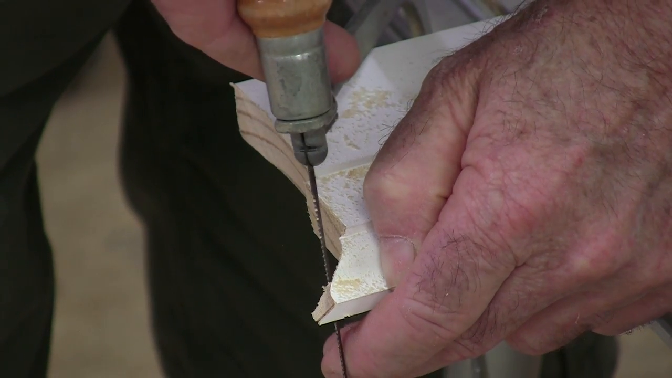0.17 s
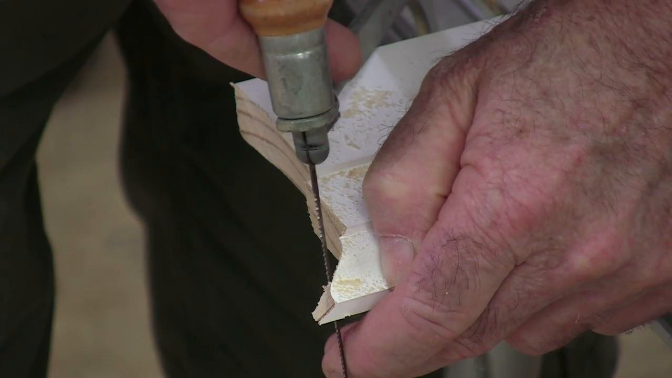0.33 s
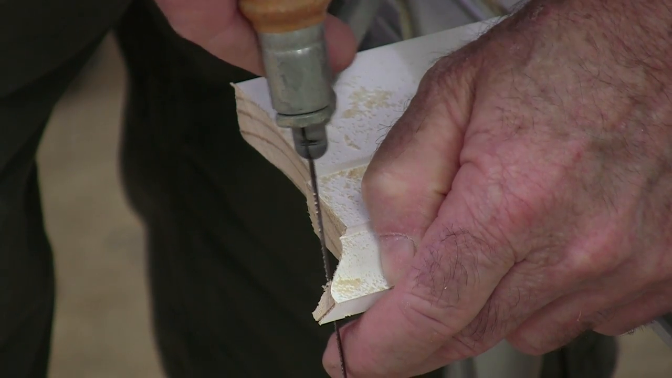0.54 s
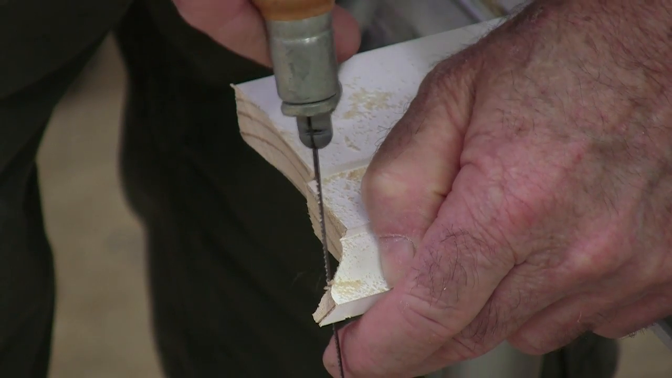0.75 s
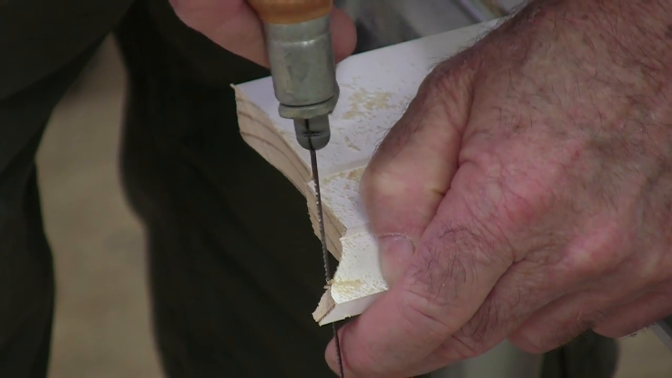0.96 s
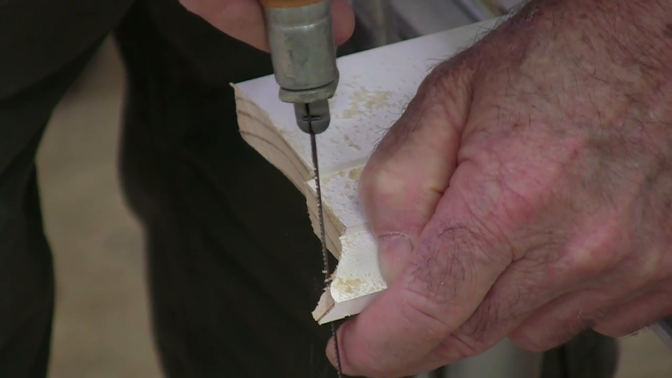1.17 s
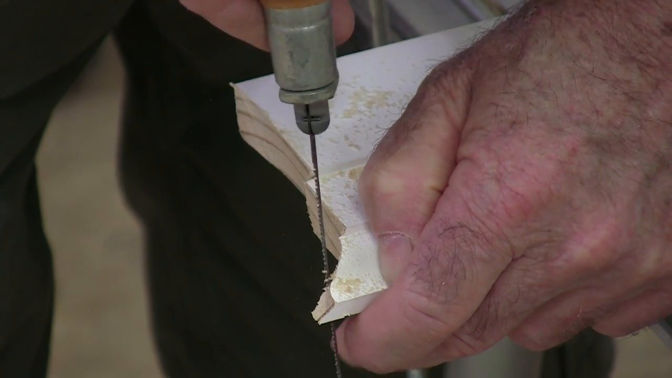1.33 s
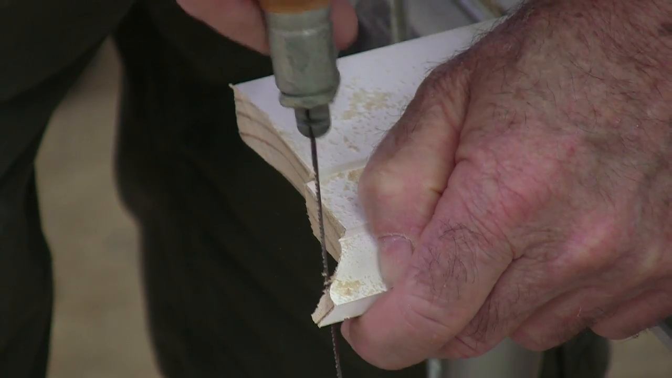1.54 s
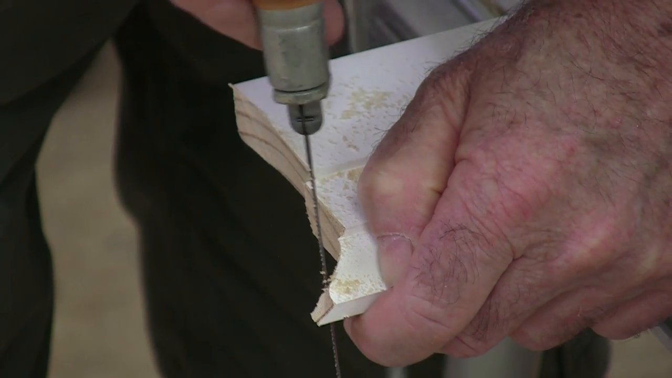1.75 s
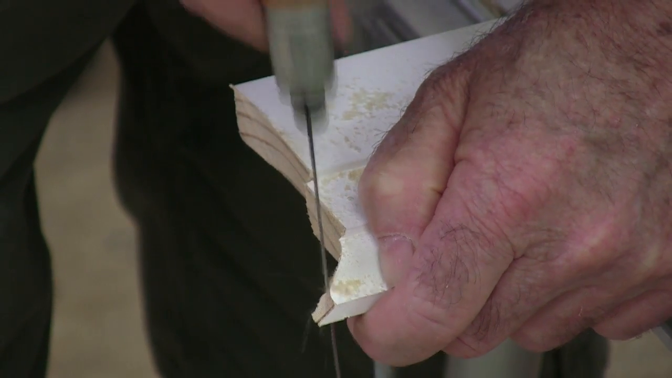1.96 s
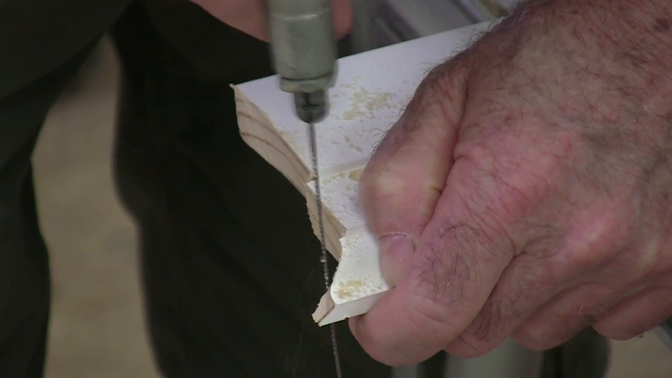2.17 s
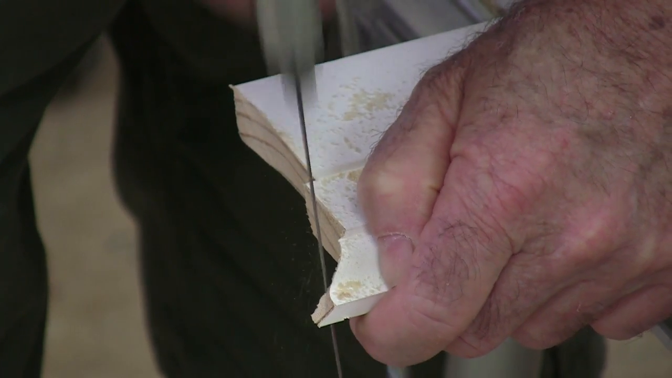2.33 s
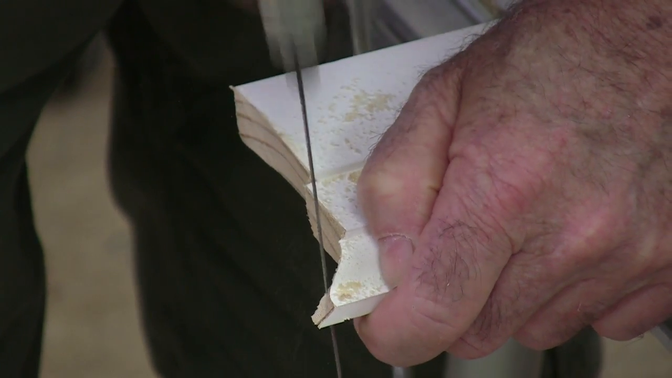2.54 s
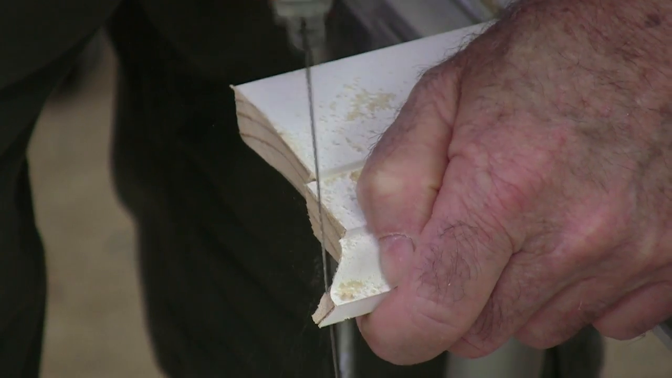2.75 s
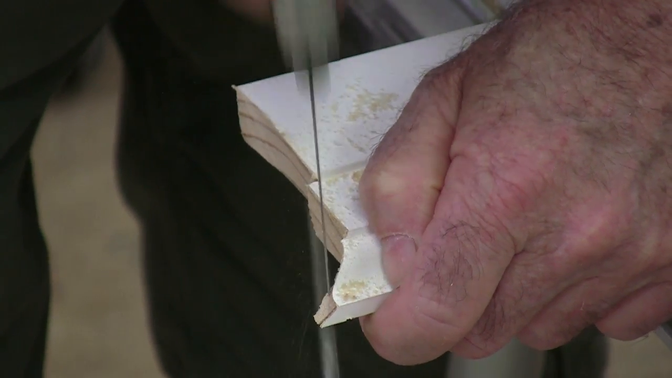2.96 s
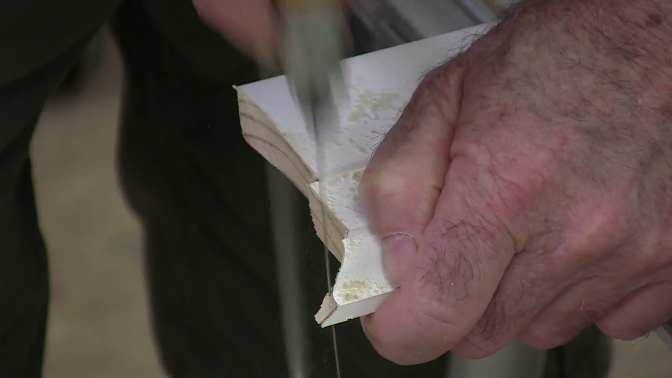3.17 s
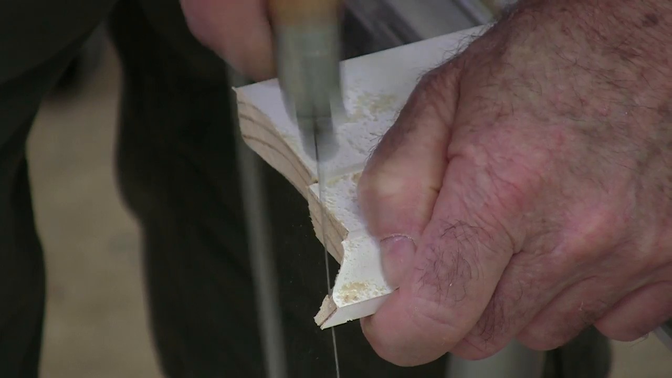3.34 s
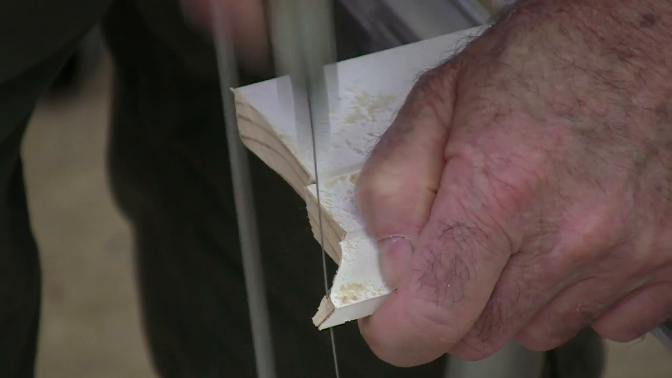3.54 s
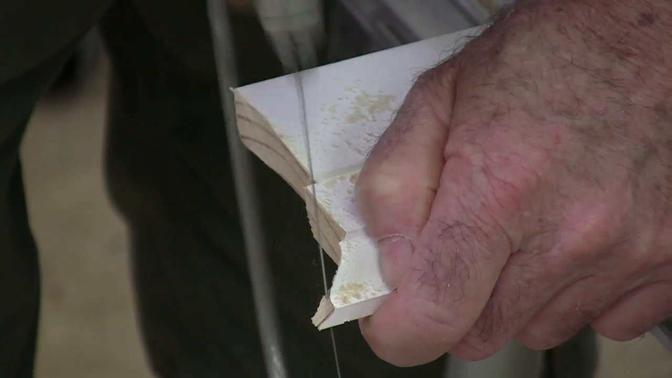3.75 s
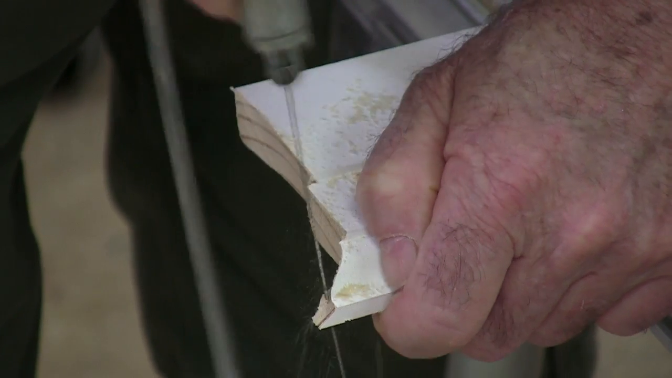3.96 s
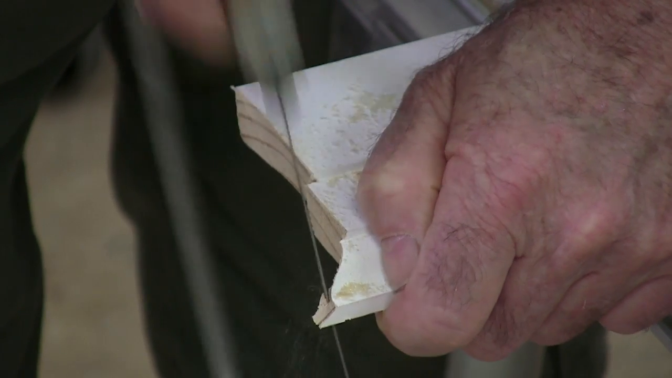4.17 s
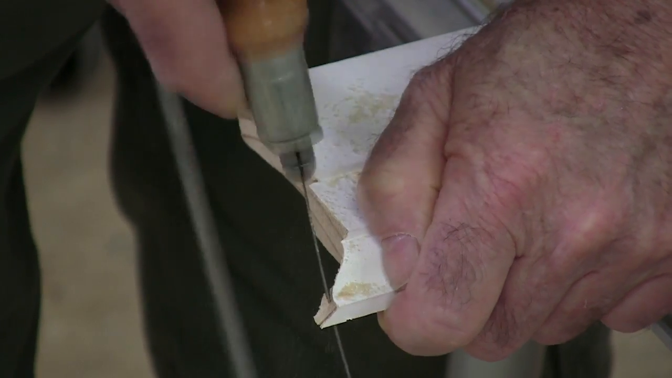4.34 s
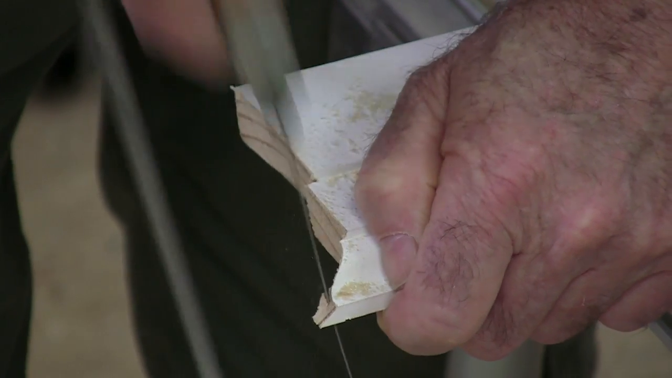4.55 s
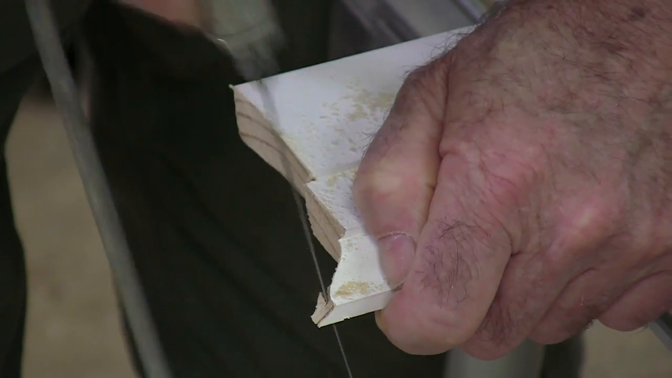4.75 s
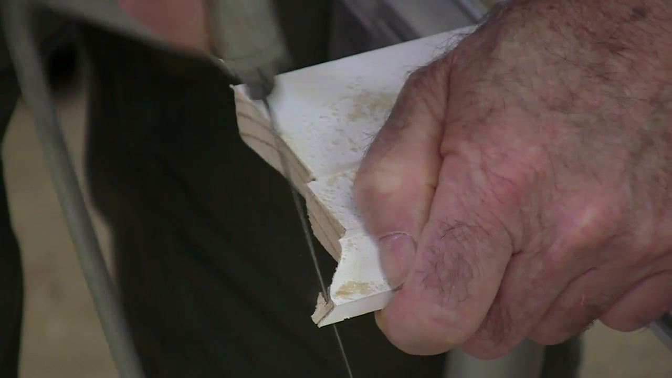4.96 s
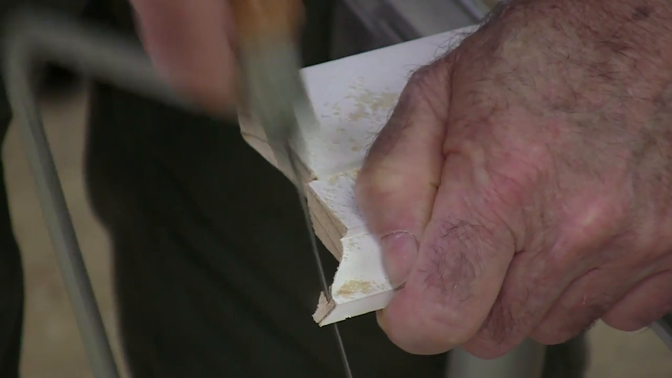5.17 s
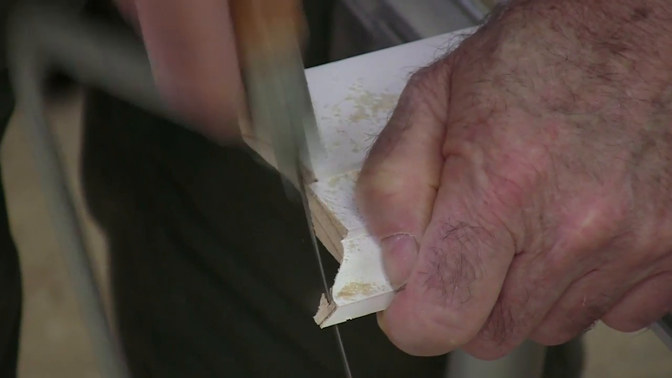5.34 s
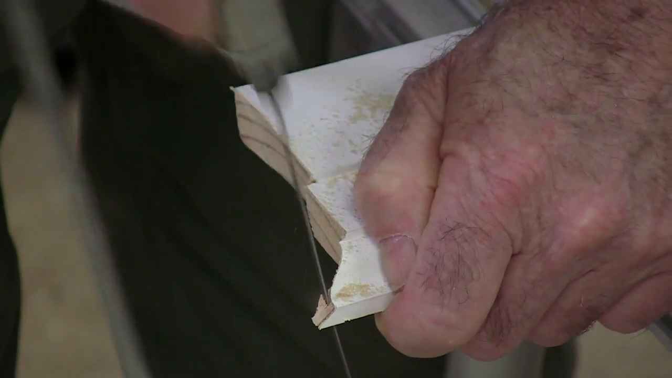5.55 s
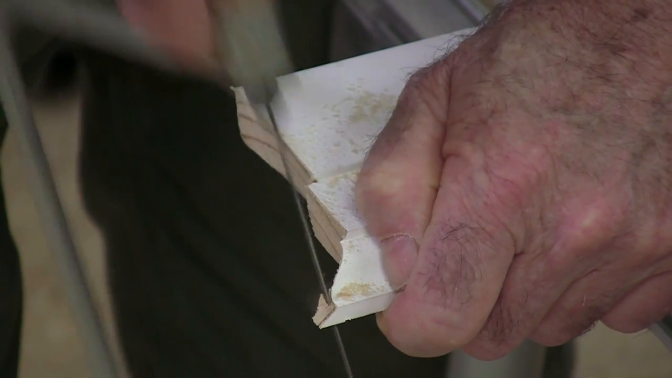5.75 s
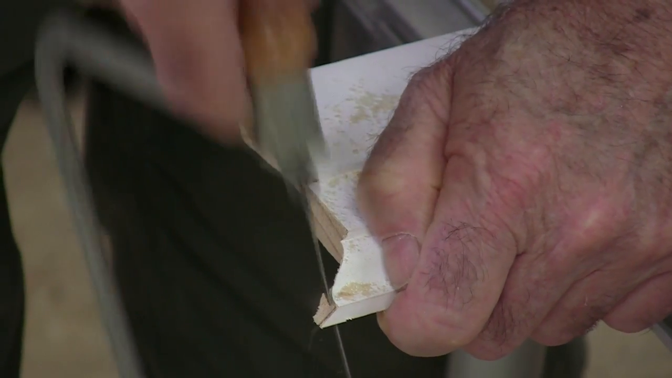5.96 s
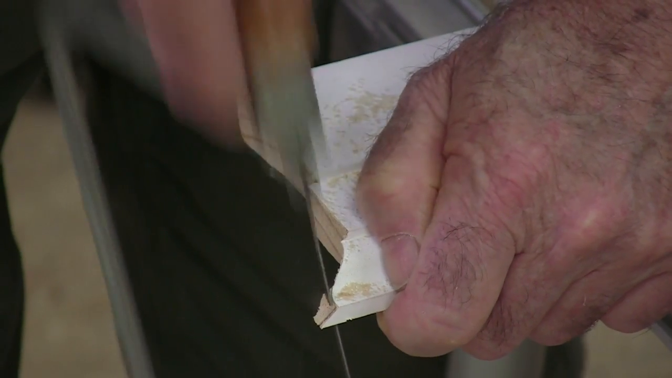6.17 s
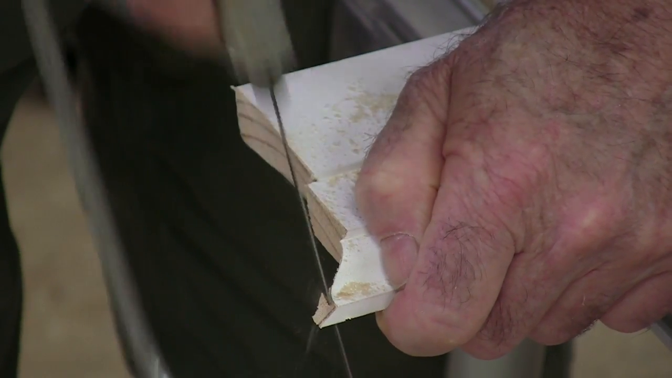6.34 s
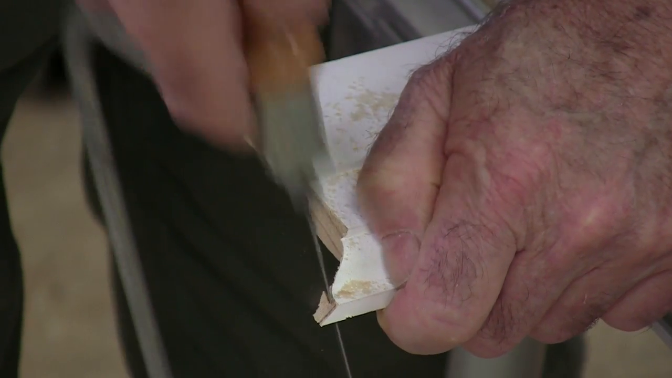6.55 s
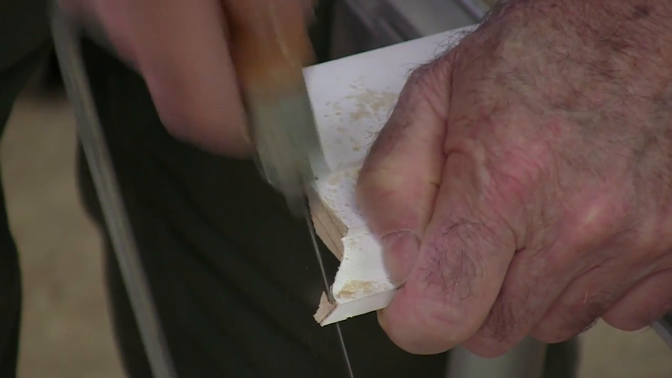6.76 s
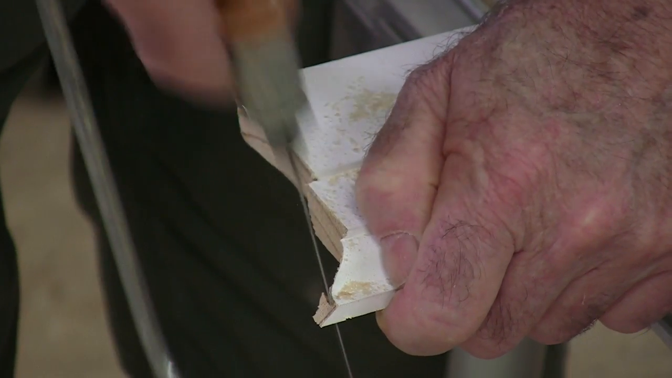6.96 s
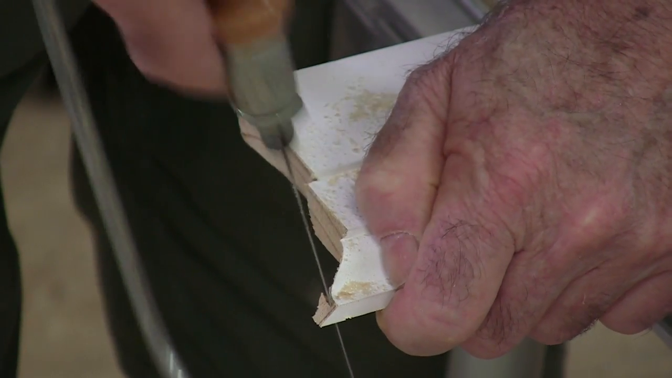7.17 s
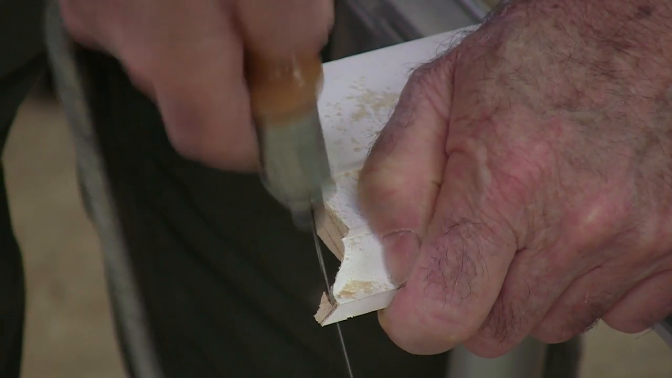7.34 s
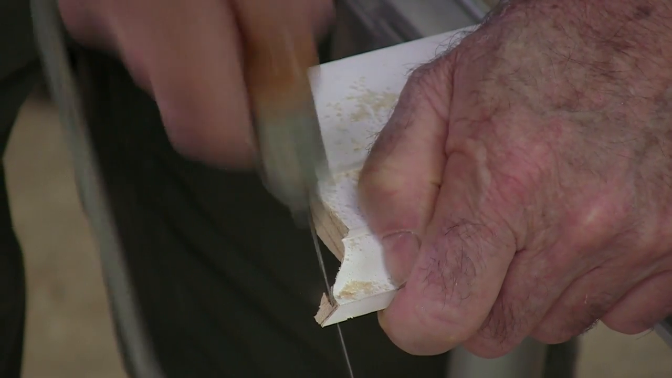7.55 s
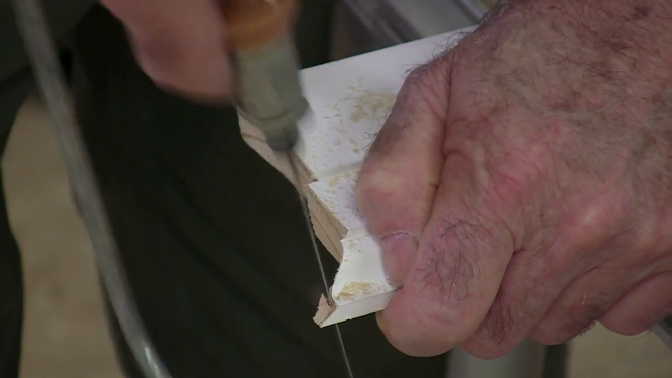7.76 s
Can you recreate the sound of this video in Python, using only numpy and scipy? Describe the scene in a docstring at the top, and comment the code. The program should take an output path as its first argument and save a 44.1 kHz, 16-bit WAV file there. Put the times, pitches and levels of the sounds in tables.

```python
"""A coping saw rasps through a hand-held piece of baseboard, there and back about four times a second,
after a few taps and light scrapes as it is set on the wood. Streams of tooth snaps and torn-fibre noise
ring the thin tip of the board and thud in its body; single blows excite the same resonances, and a
binding blade squeaks as a gliding sine. A small workshop answers with a tail of decaying noise; rumble
and hiss lie underneath, and a limiter ducks the loudest peaks."""
import sys
import numpy as np
from scipy import signal
from scipy.fft import rfft, irfft, next_fast_len
from scipy.io import wavfile
from scipy.ndimage import uniform_filter1d, minimum_filter1d, map_coordinates

SR = 44100
rng = np.random.default_rng(int(sys.argv[2]) if len(sys.argv) > 2 else 0)


def dump_mix(stems):
    """Bounce the given channels to the path in sys.argv[1] as a 16-bit WAV at rate SR."""
    frames = np.atleast_2d(stems).T  # one column per channel
    limited = np.clip(frames, -1, 1)  # hard clip at full scale
    pcm = np.round(limited * 32767).astype(np.int16)
    wavfile.write(sys.argv[1], SR, pcm)


N = 344112  # samples

# The saw strokes, there and back; levels are ahead of the mix trims. Each row: teeth catch in seconds,
# snag level in dB, cut level in dB, lean from start to end of the cut in dB, easing in mid-cut in dB,
# board flex relative to the cut in dB, return starts in seconds, return level in dB.
STROKES = [(2.024, -23, -27.5, 5, -1, 4, 2.121, -42), (2.284, -27, -27.5, -6, -1.5, -7, 2.375, -26.5),
           (2.496, -16.5, -24, -2, 1.5, -3, 2.604, -24.5), (2.738, -25, -18.5, 12.5, -2, 0, 2.846, -22.5),
           (2.98, -27, -22.5, 6, -3.5, -6, 3.096, -23), (3.224, -29, -22, 8.5, 1, -16, 3.34, -23),
           (3.462, -15.5, -23.5, 2, 0, -8, 3.58, -22.5), (3.702, -20, -20, 1.5, -1, -4, 3.822, -22),
           (3.956, -3.5, -16.5, -4, 3, -0.5, 4.076, -24), (4.209, -4.5, -19, -6, 2.5, -9.5, 4.323, -25.5),
           (4.459, -24, -24, 0, -0.5, -14.5, 4.568, -26), (4.706, -23, -26.5, -7, 1, -13, 4.829, -29),
           (4.958, -21, -27, -0.5, 3, -10, 5.076, -29.5), (5.222, -23, -28.5, 0, 3, -12.5, 5.346, -27),
           (5.484, -15.5, -20.5, 9, 2.5, -14.5, 5.617, -23), (5.759, -11, -21, 6.5, 0, -11.5, 5.89, -22.5),
           (6.031, -8.5, -17.5, 1.5, 0.5, -17, 6.175, -22), (6.33, -8.5, -17, -2, 1.5, -8.5, 6.464, -22),
           (6.614, -18, -21.5, 4, 4.5, -13, 6.76, -26.5), (6.901, -29, -25, -2, 5, -11, 7.027, -23.5),
           (7.163, -21, -24, 0, 9, -10, 7.286, -26), (7.432, -16, -24.5, -8, 4, -15.5, 7.564, -22.5),
           (7.697, -22.5, -23, 3, 3.5, -8.5, 7.81, -24)]
# Resonances of the board's body. Each row: centre in Hz, width in Hz, relative level in dB.
BODY_MODES = [(307.4, 37.7, 3), (379.8, 49, -0.5), (509, 103, -2.5), (624, 19, -17.5), (700, 50, -21)]
# Resonances of the hand's grip. Each row: centre in Hz, width in Hz, relative level in dB.
GRIP_MODES = [(58.4, 60, -.7), (127, 25.5, 6)]
# Resonances of the whole board flexing. Each row: centre in Hz, width in Hz, relative level in dB.
FLEX_MODES = [(162.5, 38, 3), (209.7, 41, .5), (240.5, 35, -4)]

SNAG_AFTER_S = 0.015  # from the reversal until the teeth catch
THUD_PER_FLEX = 0.32  # dB of body thud per dB of board flex


def amp(db):
    """Decibels to gain."""
    return 10 ** (np.asarray(db) / 20)


def unit(x):
    """Scale to rms 1."""
    return x / np.sqrt(np.mean(x ** 2) + 1e-20)


def add(out, s, sound):
    """Mix a sound into out from s seconds on."""
    part = out[round(s * SR):][:len(sound)]
    part += sound[:len(part)]


def along(points, hz):
    """Read (Hz, value) points on a log frequency axis."""
    point_hz, value = np.transpose(points)
    return np.interp(np.log(hz + 1), np.log(point_hz), value)


def filtered(x, response):
    """Multiply the spectrum of x by a response of frequency."""
    size = next_fast_len(N + SR // 2)
    gain = response(np.fft.rfftfreq(size, 1 / SR))
    return irfft(rfft(x, size) * gain, size)[:N]


def through(x, ring):
    """Play x through an impulse response."""
    return signal.fftconvolve(x, ring)[:N]


def wobble(rate):
    """A smooth random curve with rate knots a second."""
    knots = rng.standard_normal(int(N * rate / SR) + 4)
    return map_coordinates(knots, [np.arange(N) * rate / SR])


def ringing(modes, size=8192):
    """Minimum-phase impulse response, of energy 1, of a set of resonances."""
    hz = np.fft.rfftfreq(size, 1 / SR)
    power = sum((amp(db) / (1 + (2 * (hz - centre) / width) ** 2)) ** 2 for centre, width, db in modes)
    # folding the cepstrum forward in time makes the response causal
    cepstrum = irfft(np.log(power + 1e-12) / 2)
    cepstrum[1:size // 2] *= 2
    cepstrum[size // 2:] = 0
    ring = irfft(np.exp(rfft(cepstrum)))
    return ring / np.linalg.norm(ring)


def varied(modes, level_db=0.98, detune_db=0.26):
    """Each contact meets the wood at another spot: mode strengths and pitches shift a little."""
    hz, width, db = np.transpose(modes)
    chance = rng.standard_normal((len(hz), 2))
    shifted_hz = hz * amp(detune_db * chance[:, 0])  # detuning is a ratio given in dB
    return np.transpose([shifted_hz, width, db + level_db * chance[:, 1]])


def tip_ring(s, treble_from_hz=1750, width_hz=150, db=0):
    """The thin tip's ring after s seconds; one strong resonance sinks overall as the cut deepens."""
    # Resonances of the tip. Each row: centre in Hz, width in Hz, relative level in dB.
    tip_modes = [(803, 43, 0.5), (917, 123, -1.5), (1099, 176, 0), (1279, 217, 0), (1568, 14, -8.5),
                 (1665, 19, -5.5), (1872, 136, -8), (2135, 163, -14), (2433, 63, -19), (2813, 410, -22),
                 (3256, 336, -17), (3796, 260, -23.5), (4253, 550, -22.5), (4800, 130, -38)]
    # The tip's sinking resonance. Each row: time in seconds, centre in Hz.
    sinking = [(1.1, 1613), (2.2, 1456), (3.1, 1472), (4.8, 1378), (6.5, 1348)]
    # Shift of the upper tip resonances against the lower. Each row: time in seconds, shift in dB.
    treble = [(1.1, -1), (2.1, -3), (2.7, -2), (3.3, -.5), (4.2, -1), (5.1, 4), (5.7, -1), (6.7, 2),
              (7.5, -.5)]
    treble_db = np.interp(s, *np.transpose(treble))
    modes = [(hz, width, level + treble_db * (hz > treble_from_hz)) for hz, width, level in tip_modes]
    sinking_hz = np.interp(s, *np.transpose(sinking))
    return ringing(varied(modes + [(sinking_hz, width_hz, db)]))


def background(level_db=-42):
    """Steady rumble and hiss: white noise shaped by a spectrum curve."""
    # Tilt of the background noise. Each row: frequency in Hz, relative level in dB.
    air = [(20, 8.5), (35, 6.5), (90, 1), (160, -4.5), (500, -9.5), (750, -10), (1400, -13), (3000, -13.5),
           (6000, -15.5), (12000, -17), (15500, -19)]
    noise = filtered(rng.standard_normal(N), lambda hz: amp(along(air, hz)))
    return amp(level_db) * unit(noise)


def snags(thud_db=-6, shove_db=-8):
    """Each cut opens with a blow as the teeth catch; a flexing board thuds and shoves more."""
    blows = []
    for s, snag_db, _, _, _, flex_db, _, _ in STROKES:
        flexing_db = snag_db + THUD_PER_FLEX * flex_db
        blows.append((s, snag_db, flexing_db + thud_db, flexing_db + shove_db))
    return blows


def knocks(click_db=12, knock_db=18, flex_db=-5, shove_db=17, contact_hz=3300, softness=0.87,
           chatter=0.068, chatter_t60=0.024):
    """Single blows click the tip, thud the body and shove the hand; the teeth chatter briefly after."""
    # The blade knocks against the wood; levels are ahead of the trims above. Each row: time in seconds,
    # tip click in dB, body thud in dB, shove of the hand in dB.
    knock_rows = [(0.125, -33, -25.5, -58), (0.567, -26, -34, -52), (0.771, -19, -24, -30),
                  (0.791, -15, -28.5, -32), (0.796, -21, -21.5, -24), (0.803, -38, -23.5, -27),
                  (1.0848, -5, -13.5, -26), (1.1005, -11, -20.5, -13.5), (1.115, -10, -15, -20),
                  (1.120, -24, -17, -19), (2.043, -19, -18, -19), (2.761, -14, -10, -14.5),
                  (3.246, -12, -20.5, -28), (3.841, -23, -28, -33), (3.89, -10, -30, -30),
                  (3.967, -4.5, -0.5, -13), (4.227, -8, -19, -26), (6.626, -8, -27, -26),
                  (7.182, -9.5, -19.5, -33), (7.240, -10, -29, -45), (7.502, -10, -24.5, -44)]
    tip, body = np.zeros((2, N))
    t = np.arange(SR // 20) / SR
    grip = ringing(GRIP_MODES)
    flex = amp(flex_db) * ringing(FLEX_MODES)
    for s, tip_db, body_db, hand_db in knock_rows + snags():
        blow = (t == 0) + chatter * rng.standard_normal(len(t)) * amp(-60 * t / chatter_t60)
        # a blow with more thud than click is a soft, dull contact
        edge_hz = min(contact_hz * amp(softness * min(tip_db - body_db, 0)), SR / 4)
        blow = signal.sosfilt(signal.butter(4, edge_hz, fs=SR, output="sos"), blow)
        add(tip, s, amp(click_db + tip_db) * signal.fftconvolve(blow, tip_ring(s)))
        thud = amp(knock_db + body_db) * (ringing(varied(BODY_MODES)) + flex)
        add(body, s, thud + amp(shove_db + hand_db) * grip)
    return tip, body


def workshop(x):
    """The small room's answer, 5 ms late: a noise tail whose bands die at their own rates."""
    # Decay of the room. Each row: frequency in Hz, time to fall by 60 dB in seconds.
    room_decay = [(150, 0.8), (500, 0.54), (1500, 0.77), (6000, 0.28)]
    hz, t, bands = signal.stft(rng.standard_normal(SR), SR, nperseg=256)
    fading = bands * amp(-60 * t / along(room_decay, hz)[:, None])
    tail = signal.istft(fading, SR, nperseg=256)[1]
    return through(x, np.pad(tail / np.linalg.norm(tail), (SR // 200, 0)))


def teeth(speed, tooth_hz=520, scatter_db=4, tearing=0.96, uneven_db=1.5):
    """Each tooth breaks a chip with a snap of its own size, amid a crackle of fibres."""
    # the snap rate is tooth_hz times speed + 0.3, with a random flutter
    travel = np.cumsum(tooth_hz * (0.3 + speed) * amp(2.5 * wobble(300))) / SR
    at = np.flatnonzero(np.diff(np.floor(travel)))
    snaps = np.zeros(N)
    snaps[at] = amp(scatter_db * np.clip(rng.standard_normal(len(at)), -2, 2))
    crackle = unit(rng.standard_normal(N) * amp(1.9 * wobble(500)))
    force = unit(snaps) + tearing * crackle
    force -= uniform_filter1d(force, size=601)
    # the hand keeps the mean cutting force steady over a few teeth
    steady = force / np.sqrt(np.abs(uniform_filter1d(force ** 2, size=601)) + 1e-6)
    return steady * unit(amp(uneven_db * wobble(70)))


def scrapes(body_db=-7):
    """Slow teeth brush the wood in short swells as the blade is placed and eased in."""
    # Light drags; levels are ahead of the resonances. Each row: middle in seconds, length in seconds,
    # level in dB.
    scrape_rows = [(0.592, 0.045, -41.5), (0.784, 0.046, -33), (1.978, 0.05, -42.5), (2.167, .075, -32.5)]
    t = np.arange(N) / SR
    touch = np.zeros(N)
    for s, length, db in scrape_rows:
        touch += amp(db) * np.cos(np.pi * np.clip((t - s) / length, -0.5, 0.5))
    force = touch * teeth(np.zeros(N))
    return through(force, tip_ring(0)), amp(body_db) * through(force, ringing(BODY_MODES))


def passes(return_lean_db=3.5, return_flex_db=-3.7):
    """Every cut and return as (start s, end s, shape, bite dB, lean dB, easing dB, flex dB)."""
    # attack and release as shares of the pass: the cut bites sooner, the return swells
    cut_shape, return_shape = (0.2, 0.39), (0.28, 0.39)
    turns = [row[0] - SNAG_AFTER_S for row in STROKES]
    turns.append(2 * turns[-1] - turns[-2])  # the last stroke lasts as long as the one before
    for start, end, stroke in zip(turns, turns[1:], STROKES):
        _, _, cut_db, lean_db, easing_db, flex_db, back, return_db = stroke
        yield start, back, cut_shape, cut_db, lean_db, easing_db, flex_db
        yield back, end, return_shape, return_db, return_lean_db, 0, flex_db + return_flex_db


def pass_bite(u, shape, lean_db, stall_db=-19, curve=1.3):
    """Bite in dB at share u of a pass: attack from a stall, leaning hold, release to a stall."""
    attack, release = shape
    starting = np.clip(1 - u / attack, 0, 1) ** curve
    stopping = np.clip(1 - (1 - u) / release, 0, 1) ** curve
    return stall_db * (starting + stopping) + lean_db * (u - 0.5)


def arm(easing_at=0.49, easing_width=0.15, flex_fade_db=-6.5, thud_db=-2.5):
    """Blade speed, bite, thud and boom per sample; the blade all but stops at each reversal."""
    speed, bite, thud, boom = np.zeros((4, N))
    for start, end, shape, db, lean_db, easing_db, flex_db in passes():
        u = np.linspace(0, 1, round(end * SR) - round(start * SR))  # share of the pass
        easing = easing_db * np.exp(-((u - easing_at) / easing_width) ** 2)
        flexing_db = flex_db + flex_fade_db * (u - 0.5)  # the flexing settles along the pass
        add(speed, start, np.sin(np.pi * u))
        add(bite, start, amp(db + pass_bite(u, shape, lean_db) - easing))
        add(thud, start, amp(thud_db + THUD_PER_FLEX * flexing_db))
        add(boom, start, amp(flexing_db))
    return speed, bite, thud, boom


def sawing(rasp_db=0, thud_db=0, boom_db=0, grip_db=-11, fizz_db=-30, dust_db=-33):
    """Pass by pass, the tooth snaps ring the tip and the body of the board."""
    speed, bite, thud, boom = arm()
    cutting = bite * teeth(speed)
    tip, body = np.zeros((2, N))
    for start, end, *_ in passes():
        span = slice(round(start * SR), round(end * SR))
        rasp = signal.fftconvolve(cutting[span], tip_ring(start))
        add(tip, start, amp(rasp_db) * rasp)
        thudding = signal.fftconvolve(thud[span] * cutting[span], ringing(varied(BODY_MODES)))
        add(body, start, amp(thud_db) * thudding)
    # a blade that catches flexes the whole board, shakes the hand and tears more fine splinters
    catching = cutting * boom
    flex = through(catching, amp(boom_db) * ringing(FLEX_MODES) + amp(grip_db) * ringing(GRIP_MODES))
    tearing = amp(dust_db) * cutting + amp(fizz_db) * catching
    splinters = through(tearing * amp(wobble(60)), ringing([(4970, 6600, 0)]))
    return tip + splinters, body + flex


def squeaks(sag=0.078, overtone_db=-24):
    """The blade binds in the kerf: stick and slip sings near the tip's lowest resonance, arching in pitch."""
    # Squeaks. Each row: middle in seconds, length in seconds, top pitch in Hz (bar a slight waver),
    # level in dB.
    squeak_rows = [(4.143, 0.0469, 796, -19.5), (6.264, 0.0528, 803, -19), (6.543, 0.047, 836, -15.5)]
    t, out = np.arange(N) / SR, np.zeros(N)
    for s, length, top_hz, db in squeak_rows:
        u = np.clip(2 * (t - s) / length, -1, 1)
        pitch_hz = top_hz * (1 - sag * u ** 2 + 0.0036 * wobble(200))
        phase = 2 * np.pi * np.cumsum(pitch_hz) / SR
        tone = np.sin(phase) + amp(overtone_db) * np.sin(2 * phase)
        out += amp(db) * np.cos(np.pi * u / 2) * tone
    return out


def scene():
    """Saw and board close by, their room, and the steady background."""
    tip, body = np.sum([sawing(), knocks(), scrapes()], axis=0)
    tip = tip + squeaks()
    room = workshop(amp(-18.5) * tip + amp(-8.0) * body)
    return (tip + body + room + background())[None]


def record(dry, ceiling_db=-9, release_db_per_s=32, top_hz=15740):
    """A fast limiter with a slow release, then the band limit."""
    x = dry[0]
    over_db = np.maximum(20 * np.log10(np.abs(x) + 1e-9) - ceiling_db, 0)
    recovery = release_db_per_s * np.arange(N) / SR
    duck_db = np.maximum.accumulate(over_db + recovery) - recovery
    # the gain dips just ahead of each peak and is smoothed
    gain = uniform_filter1d(minimum_filter1d(amp(-duck_db), size=33), size=33)
    return filtered(x * gain, lambda hz: hz < top_hz)[None]


dry = scene()
out = record(dry)
dump_mix(out)
```